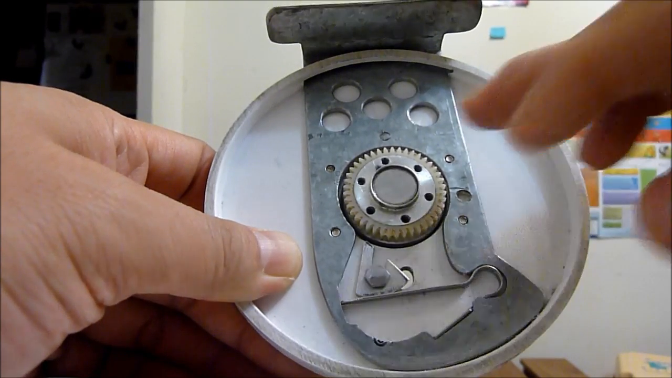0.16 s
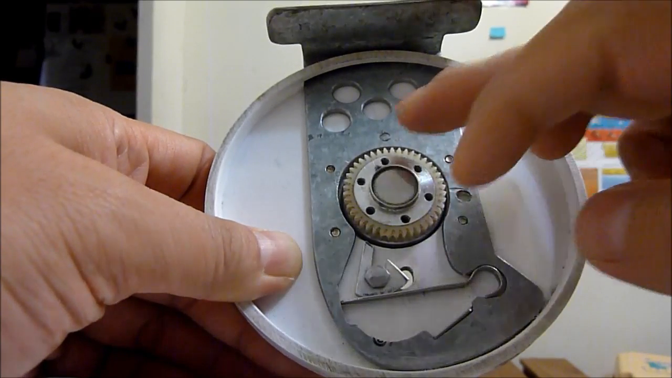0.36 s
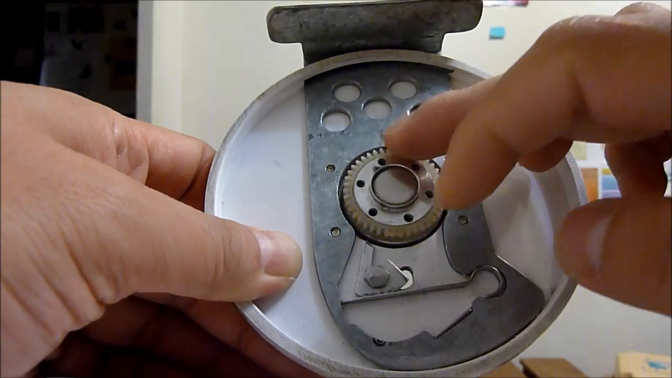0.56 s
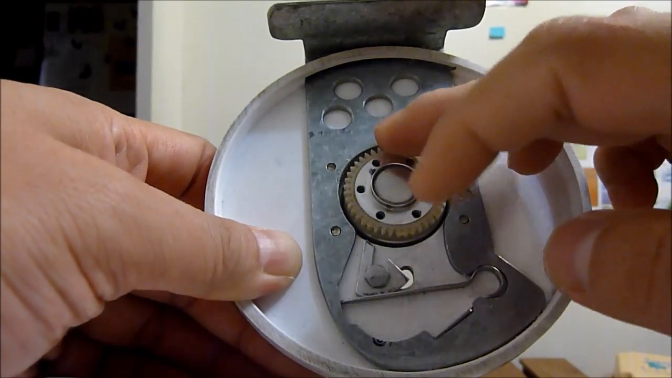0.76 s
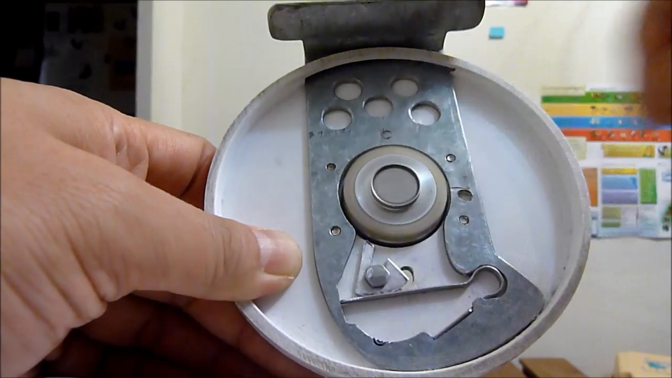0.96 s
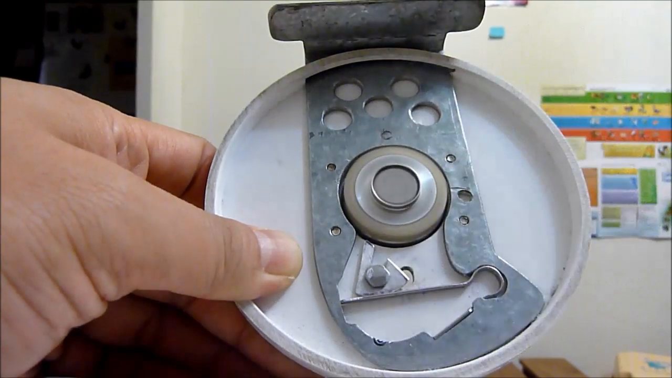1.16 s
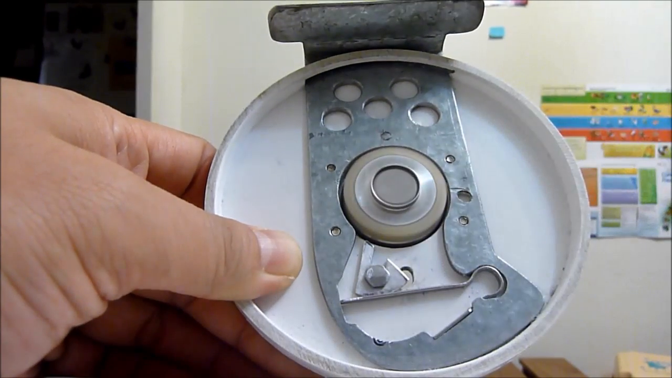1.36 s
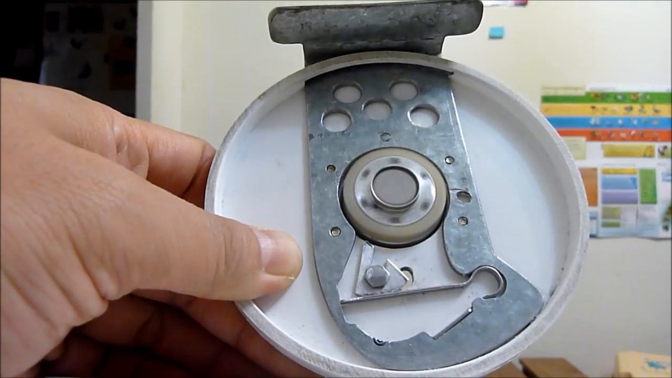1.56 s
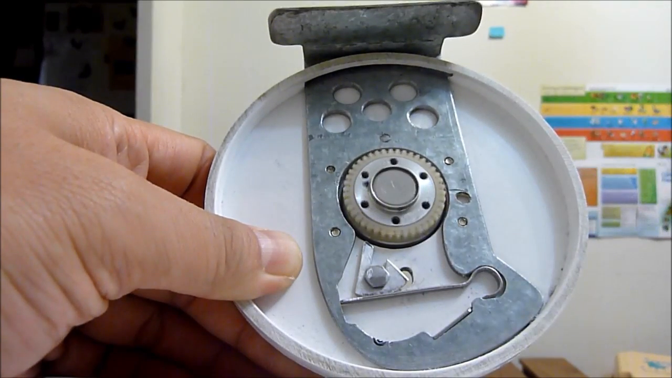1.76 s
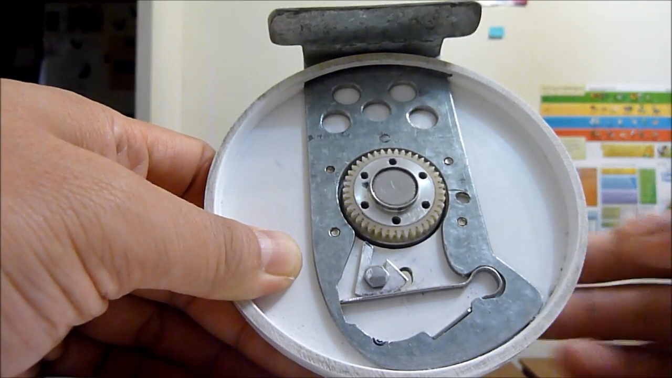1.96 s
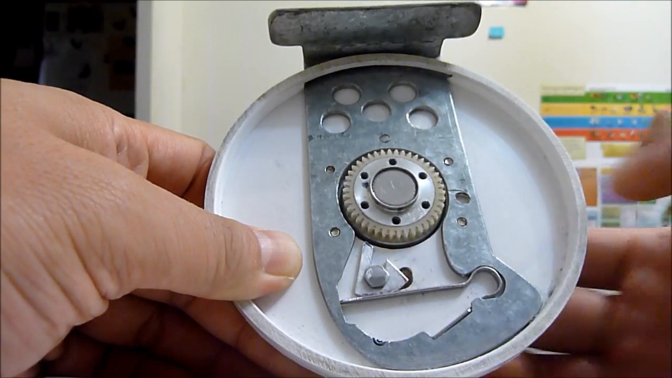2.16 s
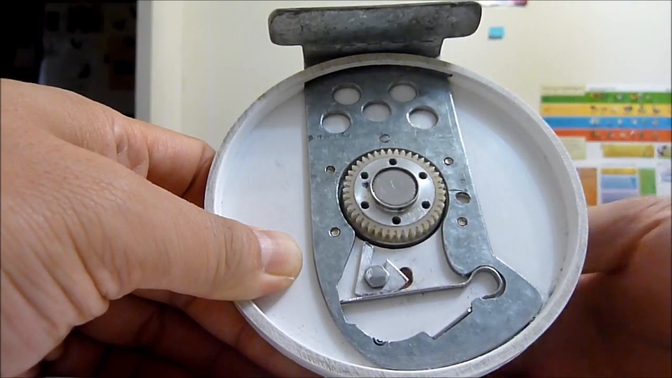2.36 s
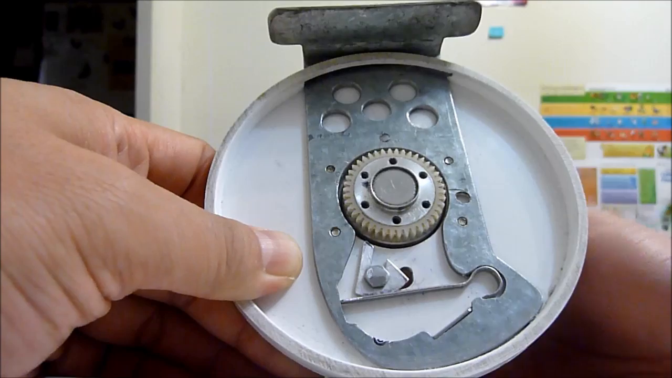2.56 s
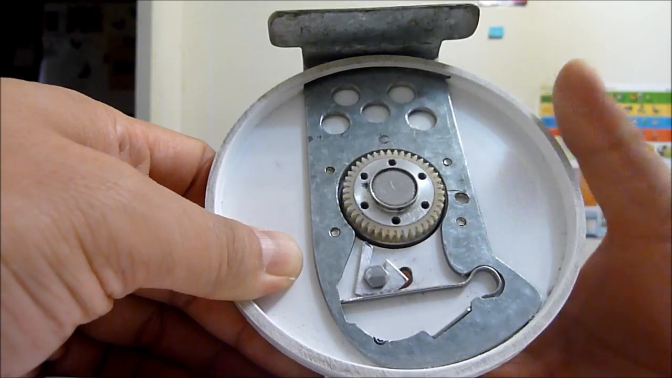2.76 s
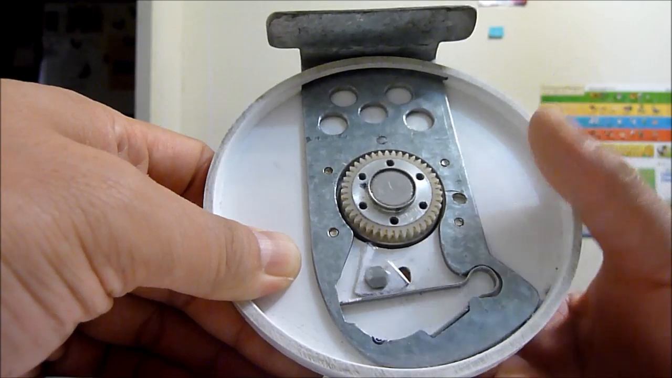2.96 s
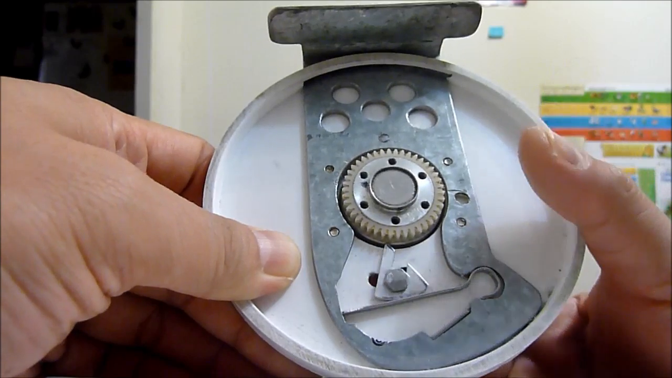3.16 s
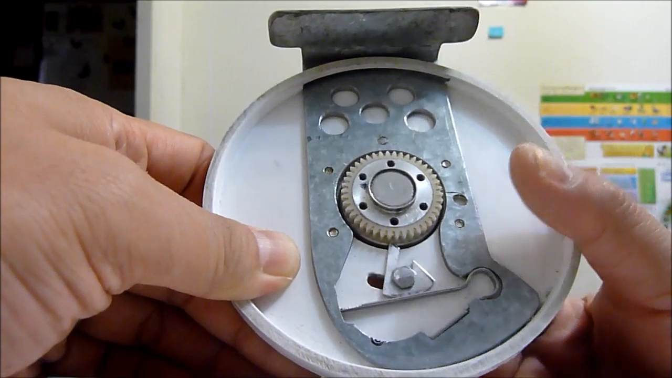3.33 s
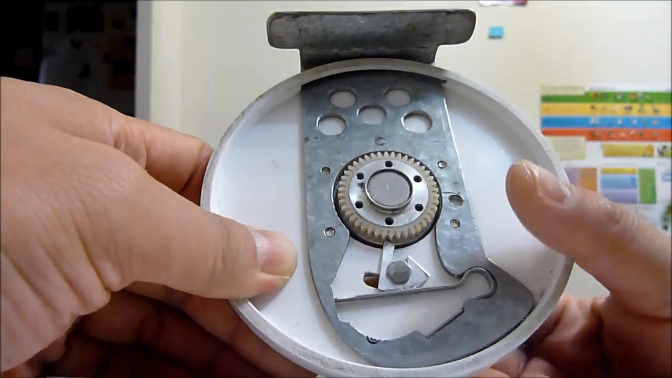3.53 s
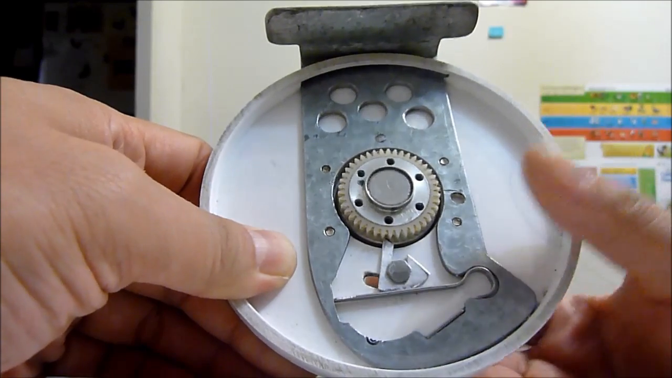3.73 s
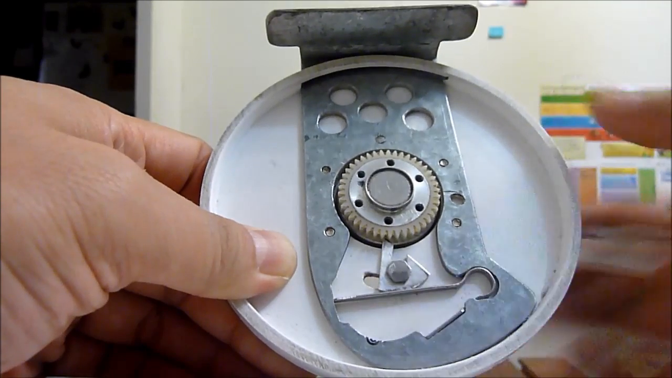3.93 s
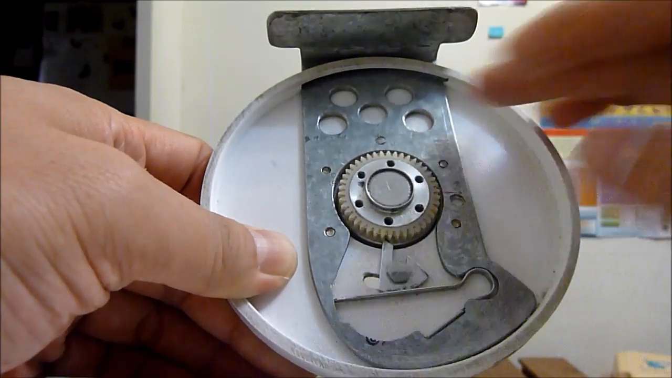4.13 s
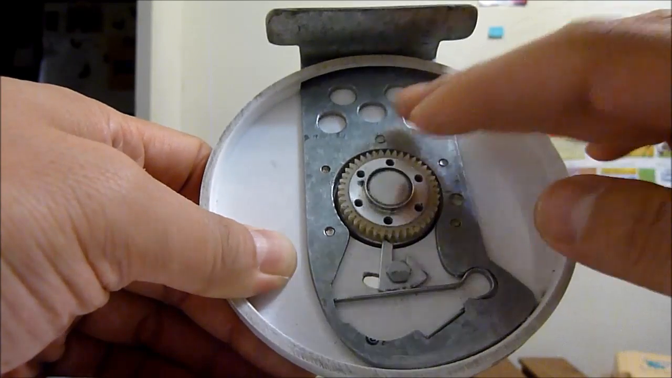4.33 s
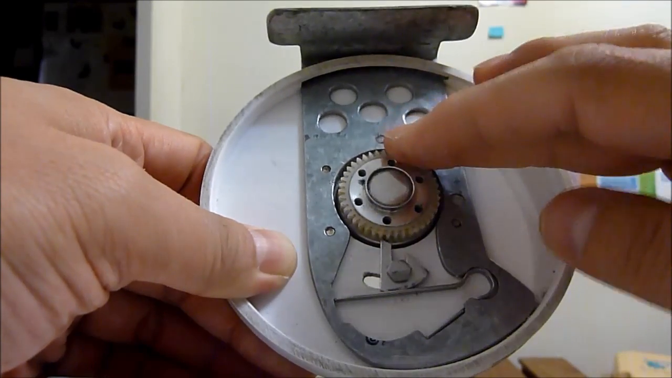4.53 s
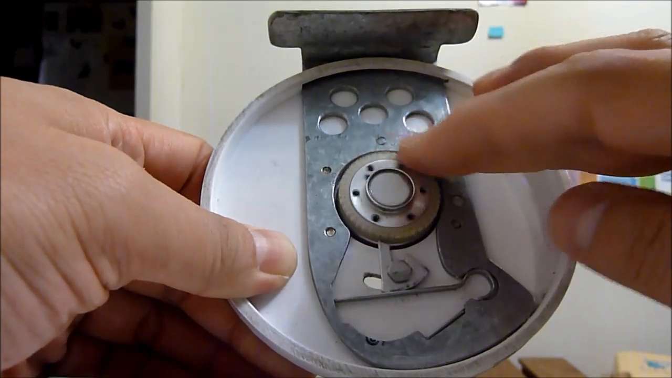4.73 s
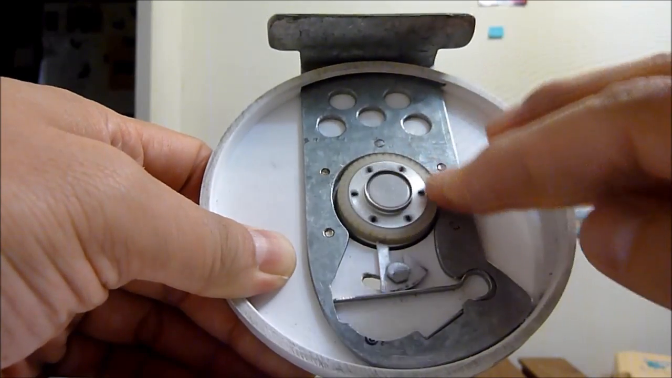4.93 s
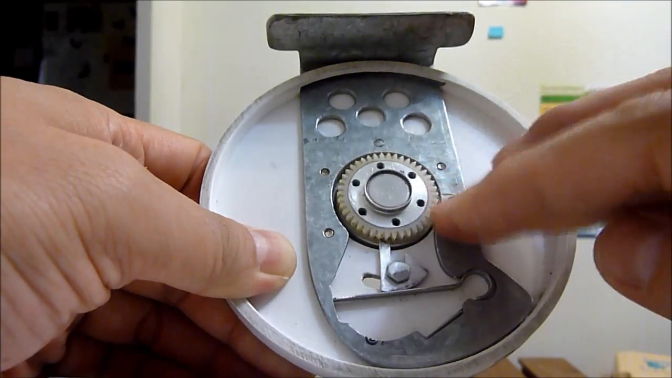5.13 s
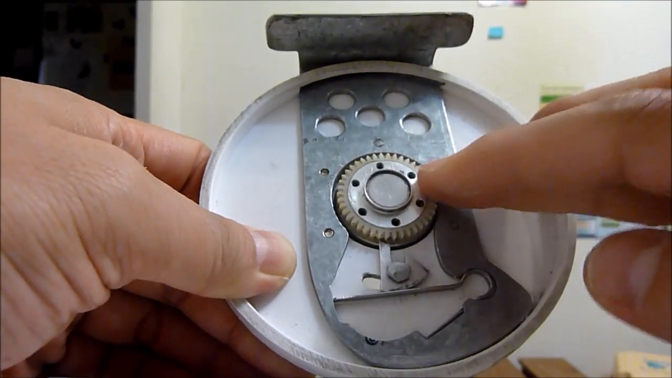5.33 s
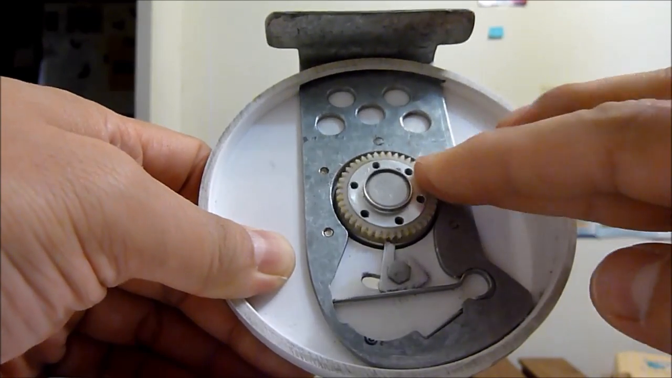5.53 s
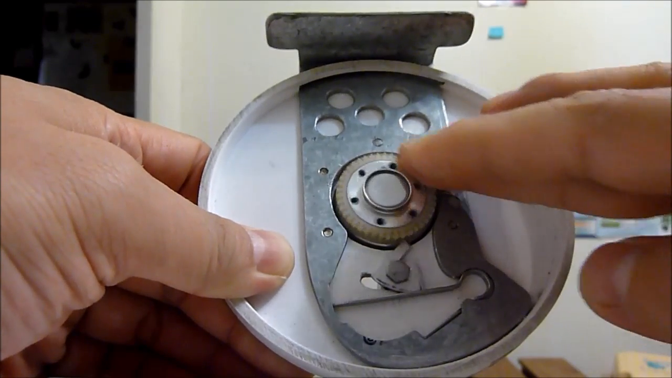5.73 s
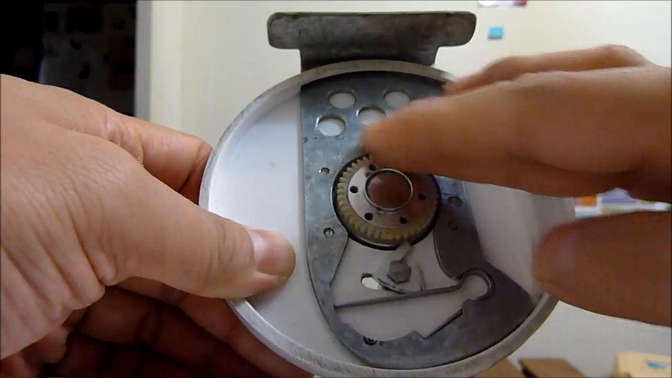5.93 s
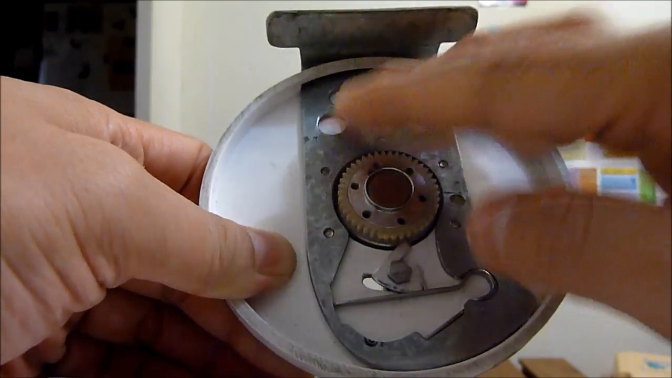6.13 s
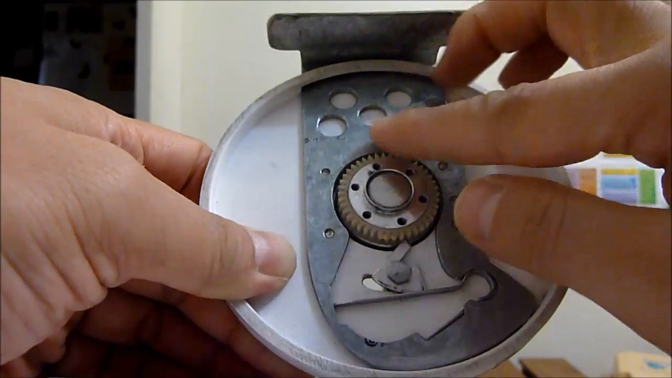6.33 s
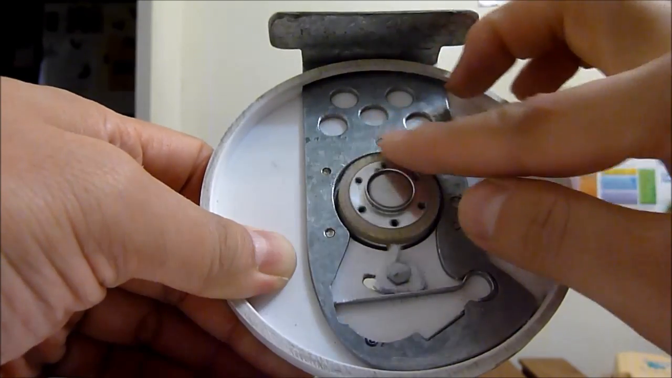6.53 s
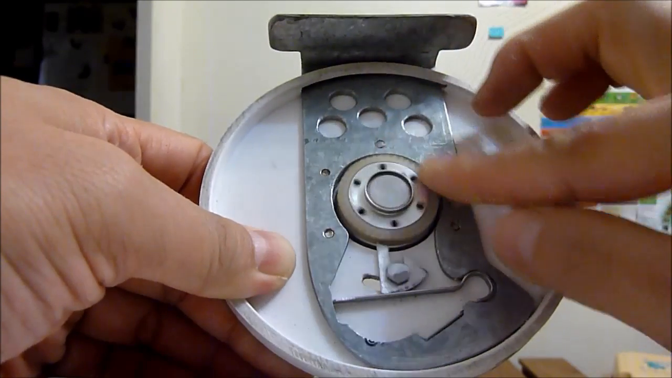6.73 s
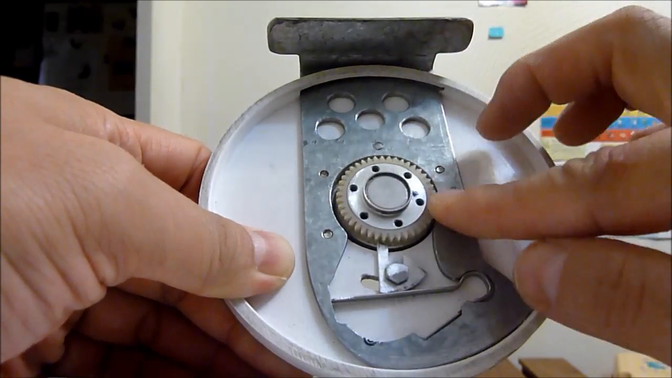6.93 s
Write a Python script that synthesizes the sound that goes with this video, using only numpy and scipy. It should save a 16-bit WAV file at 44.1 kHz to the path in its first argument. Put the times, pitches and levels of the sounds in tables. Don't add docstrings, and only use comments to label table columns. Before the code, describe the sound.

For the first 0.9 seconds there is only low, muffled room noise and hiss, with a faint short servo whirr from the camera repeating about three times a second throughout. At 0.9 a light double knock and metallic tick set a gear spinning freely, a soft grainy whir with tiny ticks fading by 1.6, with a dull tap near 1.3. Small ticks come around 2.1; from 2.6 to 3.9 fingers shift a lever, rubbing and knocking the plate, busiest and strongest at 3.1-3.4. Another tap and rub come at 4.2. From 4.73 to 5.06 a loud run of about twelve bright, dry ratchet clicks bursts out. After quiet and faint handling, a shorter burst of five snaps comes at 5.76-5.91, with a weaker click at 6.07. Soft rubbing and taps lead to a final, quickening burst at 6.65-6.89. Close microphone, small room, slight wall echo.

```python
import sys
import numpy as np
from scipy import signal
from scipy.fft import rfft, irfft
from scipy.io import wavfile
from scipy.ndimage import uniform_filter1d

SR = 44100
rng = np.random.default_rng(int(sys.argv[2]) if len(sys.argv) > 2 else 0)


def file_out(sig):
    cols = np.atleast_2d(sig).T
    lim = np.clip(cols, -1, 1)
    pcm = np.round(lim * 32767).astype(np.int16)
    wavfile.write(sys.argv[1], SR, pcm)


def invert_db(level):
    return 10 ** (np.asarray(level, dtype=float) / 20)


N = 308259
T = np.arange(N) / SR

# centre in Hz, width in Hz, level in dB.
HOUSING = [(328, 200, 0.5), (733, 242, 0.5), (1430, 310, -7.5), (2170, 720, -11.5)]


def band(x, hz, width):
    return signal.lfilter(*signal.iirpeak(hz, hz / width, fs=SR), x)


def unit(x):
    return x / np.sqrt(np.mean(x ** 2))


def peak(x, db):
    return x * invert_db(db) / np.abs(x[0]).max()


def curve(table, hz):
    points_hz, values = np.transpose(table)
    return np.interp(np.log(hz + 1), np.log(points_hz), values)


def walk(rate):
    hold = int(SR / rate)
    levels = np.repeat(rng.standard_normal(N // hold + 1), hold)
    return uniform_filter1d(levels, hold)[:N] * 0.94


def add(out, s, sound):
    i = int(s * SR)
    out[:, i:i + sound.shape[1]] += sound[:, :N - i]


def ring(modes, scatter_db, side_db, boost_db=0, rise_cycles=1.5):
    hz, db, t60 = np.transpose(modes)[:, :, None]
    size, tune, side, sign = rng.standard_normal((4, len(modes), 1))
    t = T[:2600]
    decay = invert_db(db + boost_db + scatter_db * size - 60 * t / t60)
    rise = 1 - np.exp(-t * hz / rise_cycles)
    wave = np.sign(sign) * decay * rise * np.exp(2j * np.pi * hz * (1 + 0.02 * tune) * t)
    mid = wave.imag.sum(0)
    return np.array([mid, (invert_db(side_db) * (1 + 0.31 * side) * wave.real).sum(0)])


def pawl():
    # start in seconds, level in dB, brightest ring in Hz, plate thump in dB re level.
    snaps = [(4.7307, -1.5, 4840, -24), (4.7614, -1.5, 4850, -30.5), (4.7945, -2.5, 4740, -25),
             (4.8196, -3.5, 4550, -42), (4.8503, -2, 4410, -27), (4.8779, -4, 4500, -25),
             (4.9026, -4, 4460, -27), (4.9299, -2.5, 4840, -26), (4.9593, -3.5, 4540, -25.5),
             (4.9849, -4, 4430, -22.5), (5.007, -5.5, 4420, -23.5), (5.0638, -2, 4350, -22.5),
             (5.7606, 0, 4390, -29.5), (5.7976, 0.5, 4500, -27.5), (5.844, -1, 6270, -41),
             (5.8771, -2, 5130, -24), (5.908, -6, 5300, -20), (6.0688, -12, 3950, -16),
             (6.6554, 0, 4850, -24.5), (6.6817, -2, 6100, -32), (6.7111, -3, 4970, -31.5),
             (6.7358, -3.5, 4970, -27.5), (6.763, -2.5, 4600, -34), (6.786, -3, 4580, -29),
             (6.8047, -6, 4430, -24.5), (6.8219, -7, 6360, -22.5), (6.8381, -7, 4140, -21),
             (6.8543, -6.5, 4350, -21.5), (6.8914, -4, 4200, -21.5)]
    # frequency in Hz, level in dB, t60 in seconds.
    metal_modes = [(1650, -21.5, .012), (2116, -18.5, .014), (2425, -19, 0.011), (2810, -18.5, .012),
                   (3245, -16, 0.011), (3530, -14.5, 0.011), (3950, -8, .014), (4396, -3.5, 0.005),
                   (4850, 0, 0.004), (5370, -4.5, 0.0073), (5840, -3, 0.0073), (6105, -5.5, 0.0061),
                   (6546, -7.5, 0.0074), (7600, -24.5, 0.0084)]
    # frequency in Hz, level in dB, t60 in seconds.
    plate_modes = [(587, -7, 0.036), (794, -2, 0.026), (1030, -7, 0.028), (1460, -7, 0.028)]
    # seconds after onset, level in dB.
    contacts = [
        (.0001, -11),
        (.0005, -9.5),
        (.0008, 2),
        (.0016, -7),
        (.0027, -12.5),
        (.0042, -21.5),
    ]
    out = np.zeros((2, N))
    for s, db, bright_hz, thump_db in snaps:
        favour_db = 4.4 * np.exp(-((np.array(metal_modes)[:, :1] - bright_hz) / 450) ** 2)
        metal = np.zeros((2, 3000))
        for lag, contact_db in contacts:
            i = int(lag * (1 + .1 * rng.standard_normal()) * SR)
            strike = ring(metal_modes, 2.6, -11, favour_db, rise_cycles=1.03)
            metal[:, i:i + 2600] += invert_db(contact_db) * strike
        metal /= np.sqrt(np.sum(metal[0] ** 2))
        add(out, s, metal * invert_db(db + 10.5))
        thump = ring(plate_modes, 3.16, -17.5, rise_cycles=0.31)
        add(out, s + 0.00077, thump * invert_db(db + thump_db + 2))
    return out


def burst(t60, crack_db, rise):
    t = T[:5000]
    grit = rng.standard_normal((2, len(t))) * invert_db(3.5 * rng.standard_normal(len(t))) * [[1], [invert_db(-13.5)]]
    tail = invert_db(-60 * t / max(t60, .01))
    crack = invert_db(crack_db - 60 * t / .012)
    return grit * (tail + crack) * np.minimum(t / rise, 1)


def resonate(x, body):
    total = 0
    for k, (hz, width, db) in enumerate(body):
        total = total + (-1) ** k * invert_db(db) * band(band(x, hz, width), hz, 2 * width)
    return unit(total)


def fingers():
    # start in seconds, peak in dB, thud in dB re peak, plate in dB re peak,
    # brightest plate resonance in Hz, t60 in seconds.
    knocks = [(0.905, -28.5, -9, -9, 966, 0.062), (0.911, -27.5, -21, -8.5, 970, 0.07),
              (1.277, -25.5, -9, -35, 1030, 0.087), (2.161, -37, -20, -8.5, 2070, 0.12),
              (2.288, -43, -17, -7, 930, 0.07), (2.613, -29.5, -11, -12, 950, 0.064),
              (2.622, -32.5, -14, -11.5, 1020, 0.07), (2.728, -33, -19, -10.5, 2480, 0.084),
              (2.826, -39.5, -17, -6, 1070, 0.057), (2.854, -36.5, -8.5, -11, 1060, 0.061),
              (2.883, -29, -17.5, -7.5, 1450, 0.16), (2.955, -38.5, -12.5, -14, 1550, 0.07),
              (2.999, -43, -15, -8, 1980, 0.07), (3.097, -40.5, -5, -15, 982, 0.077),
              (3.121, -31, -11.5, -12, 930, 0.092), (3.137, -24.5, -19.5, -8, 915, 0.075),
              (3.156, -23.5, -16.5, -9, 1430, 0.061), (3.21, -24.5, -16.5, -10.5, 1430, 0.075),
              (3.296, -20.5, -19, -8.5, 2690, 0.065), (3.309, -24, -14.5, -9, 920, 0.055),
              (3.36, -25, -19, -12, 1130, 0.034), (3.407, -28.5, -17, -10, 1050, 0.048),
              (3.42, -41, -14, -10, 985, 0.075), (3.474, -39.5, -11, -12, 945, 0.057),
              (3.504, -37, -13, -14, 1070, 0.084), (3.529, -38, -15, -12.5, 1040, 0.082),
              (3.649, -44.5, -10, -11, 1130, 0.056), (3.697, -44, -6.5, -15, 912, 0.092),
              (3.743, -38.5, -15, -10, 1030, 0.14), (3.779, -37, -19, -9.5, 960, 0.058),
              (3.854, -44.5, -14, -8, 1800, 0.07), (4.183, -29.5, -17.5, -10.5, 1020, 0.12),
              (4.196, -27.5, -16, -7, 1970, 0.17), (4.532, -39.5, -20, -10.5, 1030, 0.07),
              (5.552, -41, -15, -12, 1010, 0.07), (5.59, -37, -12, -7.5, 1500, 0.097),
              (5.65, -37, -13, -8.5, 1320, 0.1), (5.732, -40, -3.5, 2.5, 1870, 0.16),
              (6.174, -41.5, -15, -6.5, 1990, 0.076), (6.261, -43, -11.5, -5, 902, 0.07),
              (6.313, -34, -10, -14.5, 958, 0.07), (6.423, -35, -11.5, -7, 1890, 0.1),
              (6.535, -42, -11, -8, 1020, 0.081), (6.612, -40, -9.5, -7, 1020, 0.062)]
    # start in seconds, peak in dB, ring in Hz, broad crack in dB, t60 in seconds.
    metal_ticks = [(0.9108, -24.5, 4130, -13, 0.077), (1.0074, -34, 4270, -13, 0.064),
                   (1.0286, -33.5, 4110, -12, 0.062), (1.047, -37, 4040, -14, 0.07),
                   (1.0979, -36, 4240, -12, 0.07), (1.1283, -37.5, 4340, -13, 0.07),
                   (2.1031, -42, 4220, -15, 0.076), (2.1515, -35, 4270, -12, 0.07),
                   (2.162, -31.5, 4320, -14, 0.053), (2.828, -32.5, 4280, -17, 0.063),
                   (3.0001, -42.5, 4390, -14, 0.062), (3.7454, -42, 4130, -12, 0.07),
                   (3.7813, -43.5, 3710, -11, 0.07), (4.1849, -37, 4560, -13, 0.064),
                   (6.6134, -42, 4180, -13, 0.07), (0.9204, -30, 4240, -3, 0.056),
                   (0.9444, -37, 5800, -6, 0.037), (0.9654, -36, 4120, -3, 0.04),
                   (1.253, -37.5, 4130, -7, 0.04), (2.6132, -28, 5200, -5, 0.033),
                   (2.6224, -43, 4990, -3, 0.04), (2.7292, -43, 3950, -3, 0.04),
                   (2.7414, -46, 5860, -3, 0.044), (3.1223, -40, 3610, -3, 0.04),
                   (3.1385, -33, 5470, -3, 0.046), (3.1557, -29, 6100, -4, 0.037),
                   (3.2141, -40.5, 6000, -3, 0.04), (3.3008, -44, 4240, -3, 0.04),
                   (3.3005, -20, 3900, -1.5, 0.04), (3.477, -43.5, 4590, -5, 0.037),
                   (3.5094, -43, 4480, -5, 0.04), (3.6775, -52, 4540, -3, 0.054),
                   (4.5356, -51, 3890, -5, 0.04), (5.651, -39, 5970, -3, 0.036),
                   (5.661, -41, 3890, -4, 0.031), (6.175, -44, 5130, -3, 0.035)]
    # centre in Hz, width in Hz, level in dB.
    thud_body = [(155, 56, -4), (278, 132, -2.5), (471, 254, 0.5)]
    out = np.zeros((2, N))
    for s, db, thud_db, plate_db, hz, t60 in knocks:
        thud = resonate(burst(1.32 * t60, -11.5, 0.0027), thud_body)
        add(out, s, peak(thud, db + thud_db + 8))
        plate_body = list(HOUSING[1:]) + [(hz, 0.35 * hz, -1), (3000, 900, -12)]
        plate = resonate(burst(t60, 4.9, 0.00068), plate_body)
        add(out, s, peak(plate, db + plate_db + 8))
    for s, db, hz, broad_db, t60 in metal_ticks:
        tick_body = [(hz, 420, 0), (5700, 3600, broad_db - 5.5)]
        add(out, s, peak(resonate(burst(t60, broad_db + 7.5, .0015), tick_body), db))
    return out


def rubbing():
    # time in seconds, plate level in dB, metal level in dB, room noise included.
    rubs = [
        [(0.9, -51, -56), (0.968, -50.5, -54.5), (1.078, -51.5, -52.5), (1.162, -53.5, -53), (1.444, -54, -62),
         (1.6, -65, -66.5)],
        [(2.6, -63, -65), (2.738, -52.5, -62), (3.058, -52.5, -61), (3.174, -48.5, -65), (3.348, -61, -60),
         (3.52, -53, -64), (3.95, -56, -65)],
        [(4.12, -53, -62), (4.324, -49, -64), (4.45, -63, -63)],
        [(5.5, -54.5, -63), (5.668, -53, -62), (5.75, -53.5, -65)],
        [(5.95, -47.5, -54.5), (6.096, -53, -62), (6.306, -54.5, -62), (6.538, -53.5, -62.5),
         (6.64, -53.5, -60)],
    ]
    quiet_db = -54.5, -65.5
    # centre in Hz, width in Hz, level in dB.
    gear_body = [(4270, 420, 5), (5360, 770, -5.5), (6440, 860, -5)]
    out = 0
    for column, body in enumerate((HOUSING, gear_body)):
        gain = np.zeros(N)
        for rows in rubs:
            rows = np.array(rows)
            total_db = np.interp(T, rows[:, 0], rows[:, column + 1], -99, -99)
            power = invert_db(2 * total_db) - invert_db(2 * quiet_db[column])
            gain += np.sqrt(np.maximum(power, 0))
        grains = rng.standard_normal((2, N)) * invert_db(3.1 * walk(70)) * [[1], [invert_db(-14.5)]]
        out = out + uniform_filter1d(gain, 400) * resonate(grains, body) * invert_db(-2.0)
    return out


def walls(x):
    # centre in Hz, width in Hz, level in dB, t60 in seconds.
    tail_bands = [(900, 1700, -22, .3), (2600, 2000, -22.5, 0.18), (4500, 9000, -28, 0.15),
                  (6640, 2400, -24, 0.11)]
    wall_s, wall_db = .0094, -19.5
    t = T[:SR // 2]
    tail = 0
    for hz, width, db, t60 in tail_bands:
        hiss = unit(band(rng.standard_normal((2, len(t))), hz, width))
        tail = tail + invert_db(db - 60 * t / t60) * hiss
    swell = np.clip((t - wall_s) / 0.0024, 0, 1)
    tail = tail * swell * invert_db(-25) * [[1], [invert_db(-5.5)]]
    echo_gain = (t > wall_s) * invert_db(wall_db - 10 - 60 * np.abs(t - wall_s) / 0.0076)
    echo = band(echo_gain * rng.standard_normal((2, len(t))), 6200, 4400) * [[1], [.4]]
    return signal.fftconvolve(x[:1], tail + echo, axes=1)[:, :N]


def servo():
    # centre in Hz, width in Hz, level in dB, delay in seconds, length in seconds.
    whirrs = [(6000, 450, -61.5, 0.0, 0.041), (5300, 930, -63, 0.023, .05), (1450, 400, -60, 0.015, 0.044)]
    start_s, period_s = 0.209, .301
    out = 0
    for hz, width, db, delay, length in whirrs:
        since = (T - start_s - delay) % period_s
        gate = np.sin(np.pi * np.minimum(since / length, 1))
        whirr = unit(band(band(rng.standard_normal((2, N)), hz, width), hz, width))
        out = out + invert_db(db + 1.2 * walk(2.92)) * gate * whirr
    return out * [[1], [invert_db(-10.5)]]


def room_noise():
    # frequency in Hz, density in dB per Hz.
    mid_points = [(18, -72.5), (30, -38), (198, -9.5), (238, -7), (267, -8), (300, 0.5), (353, -7),
                  (590, -2), (1050, -7), (1130, -10.5), (4260, -19.5), (6330, -20.5), (7800, -33),
                  (10100, -66), (17200, -120)]
    # frequency in Hz, side minus mid in dB.
    side_points = [(60, -16), (110, -14), (200, -15), (380, -5.5), (700, -4.5), (1290, 3.5), (2380, 4.5),
                   (4400, 5.5), (8120, -3), (15000, 0)]
    hz = np.arange(N // 2 + 1) * SR / N
    mid_db = curve(mid_points, hz)
    colour = invert_db([mid_db, mid_db + curve(side_points, hz)])
    noise = irfft(rfft(rng.standard_normal((2, N))) * colour, N)
    low = signal.sosfilt(signal.butter(2, 1200, fs=SR, output="sos"), noise)
    noise = noise + low * (invert_db(1.4 * walk(7.5)) - 1)
    return noise * invert_db(-54) / np.std(noise[0])


def scene():
    no_bass = signal.butter(3, 130, "high", fs=SR, output="sos")
    reel = signal.sosfilt(no_bass, pawl() + fingers() + rubbing())
    mid, side = reel + walls(reel) + room_noise() + servo()
    return np.array([mid + side, mid - side])


def converter_slips():
    # start in seconds, peak in dB above 9 kHz, left minus right in dB, blur in samples.
    slips = [row + (.4,) for row in [(4.7326, -31, -10), (4.7411, -30, -6.5)]] + [(4.7616, -38.5, -2, 1.6),
             (4.794, -52, 3, 1.6), (4.8184, -55, 2.0, 1.6), (4.8234, -45, -5, 1.6), (4.876, -61, 0.5, 1.7),
             (4.8813, -53, -0.5, 1.6), (4.9056, -64, -4, 1.6), (4.9048, -50, -4.5, 1.6),
             (4.9337, -63, 8, 1.6), (4.96, -46.5, -7, 1.6), (4.9841, -72, 0, 1.6), (5.7593, -40, 26.0, 1.6),
             (5.8067, -63, 4.5, 1.8), (5.844, -37, -7, 1.6), (5.874, -67, -7, 1.6), (5.9084, -35.5, -13, 2),
             (6.6553, -27, 13.5, 1.1), (6.6814, -59, 0, 1.6), (6.7111, -53, 7, 1.6),
             (6.7331, -54, 10.0, 1.9), (6.762, -53, 10.0, 2.4), (6.7824, -43, 14, 3.1),
             (6.8049, -77, 11, 1.6), (6.8379, -52, 12.0, 1.6), (6.8535, -49.5, 5.0, 3.1)]
    out = np.zeros((2, N))
    k = np.arange(-8, 9)
    for s, db, pan_db, blur in slips:
        lift = np.exp((2 * np.pi * 9500 / SR * blur) ** 2 / 2) / blur
        pulse = lift * np.exp(-(k / blur) ** 2 / 2)
        left_right_db = np.clip([pan_db, -pan_db], -20, 6) / 2
        i = int((s + 0.0013) * SR)
        out[:, i + k] = np.outer(invert_db(db + 9.5 + left_right_db), pulse)
    return signal.sosfilt(signal.butter(6, [4000, 15800], "band", fs=SR, output="sos"), out)


def top_cut(x):
    return signal.sosfilt(signal.butter(12, 16810, fs=SR, output="sos"), x)


def record(dry):
    rounded = np.tanh(.8 * dry) / .8
    out = signal.sosfilt(signal.ellip(10, .3, 75, 7590, fs=SR, output="sos"), rounded)
    return top_cut(out + converter_slips())


dry = scene()
out = record(dry)
file_out(out)
```